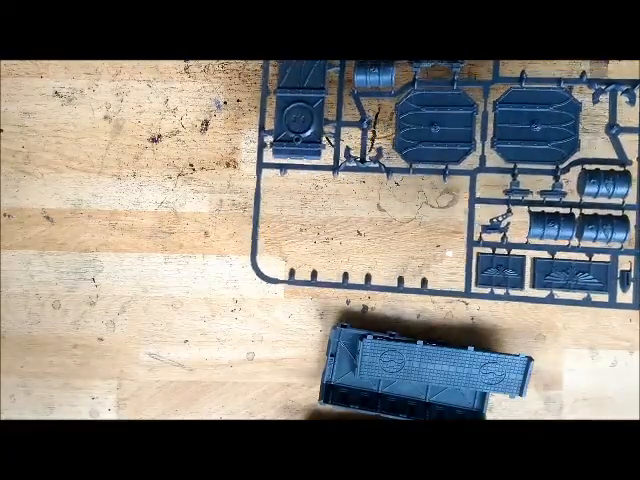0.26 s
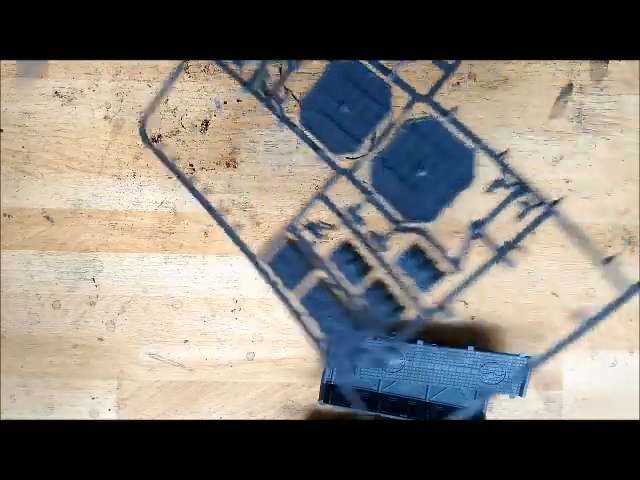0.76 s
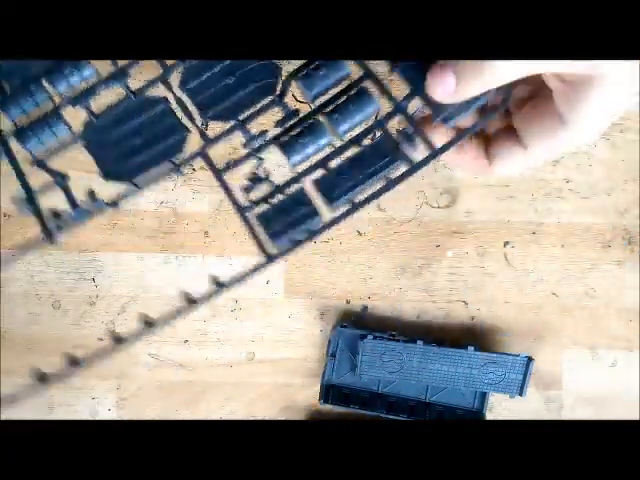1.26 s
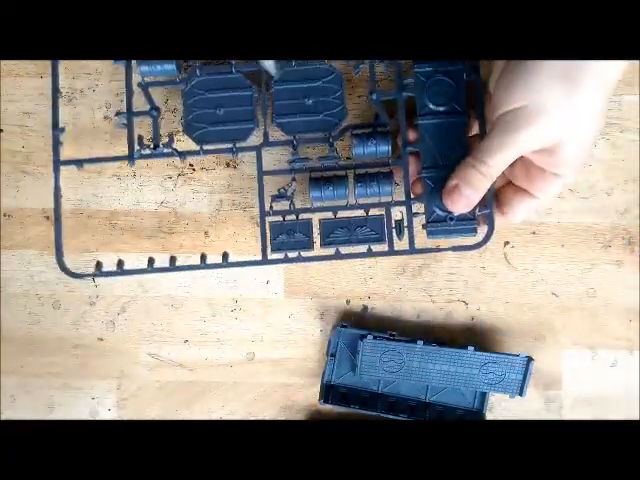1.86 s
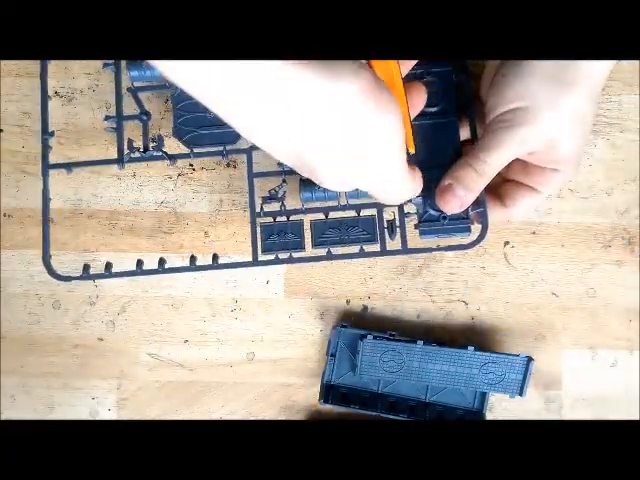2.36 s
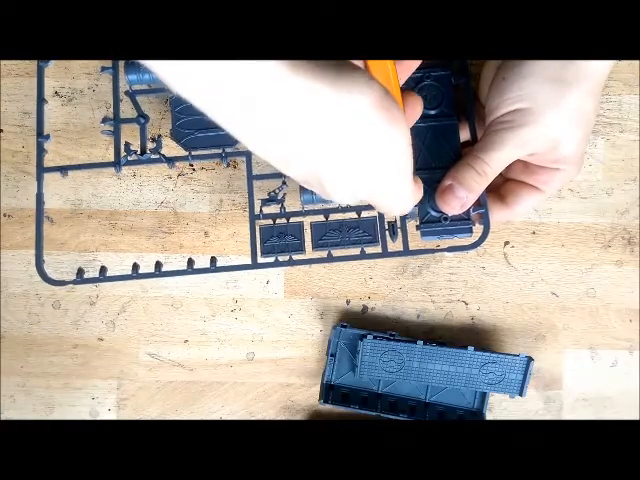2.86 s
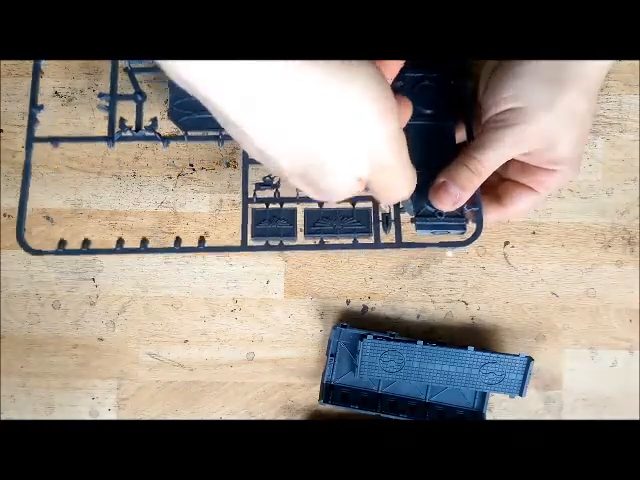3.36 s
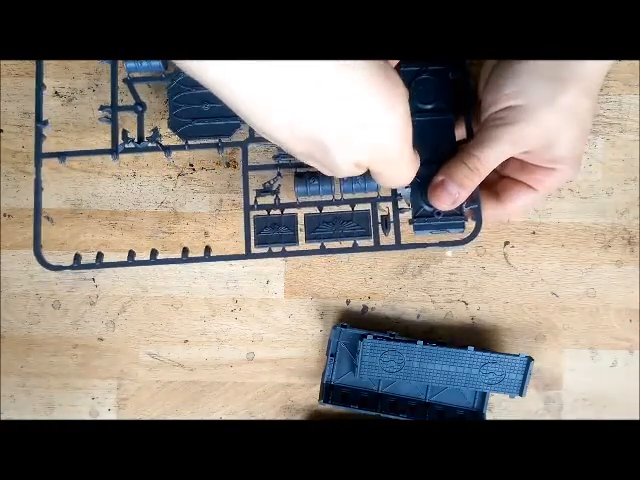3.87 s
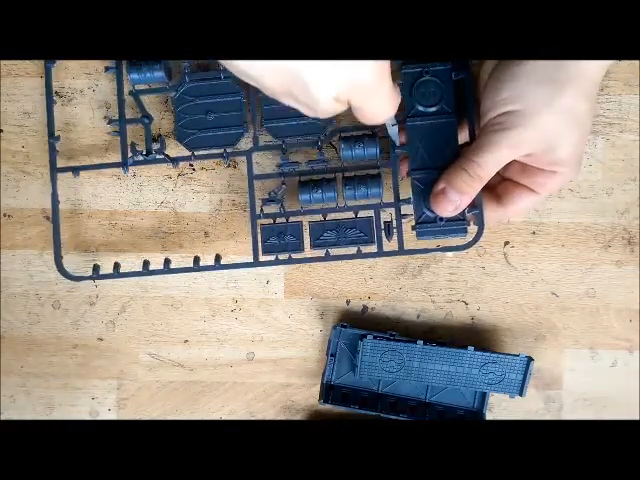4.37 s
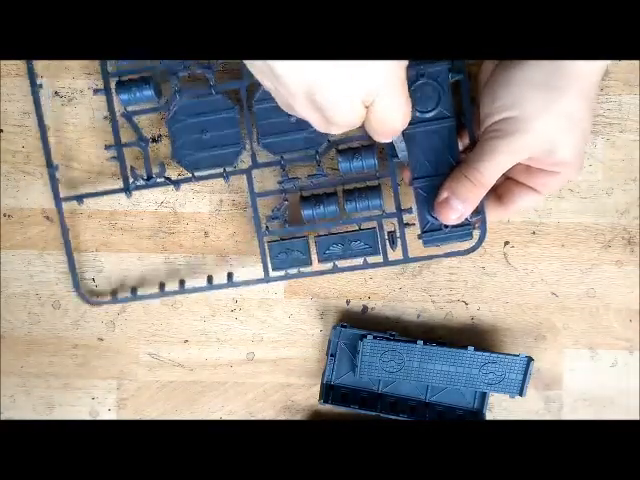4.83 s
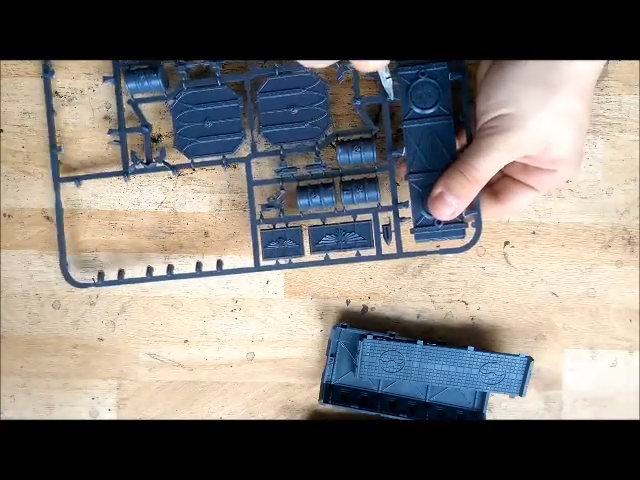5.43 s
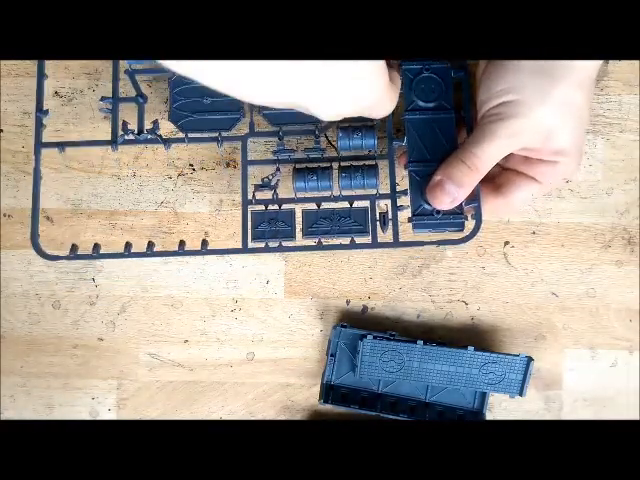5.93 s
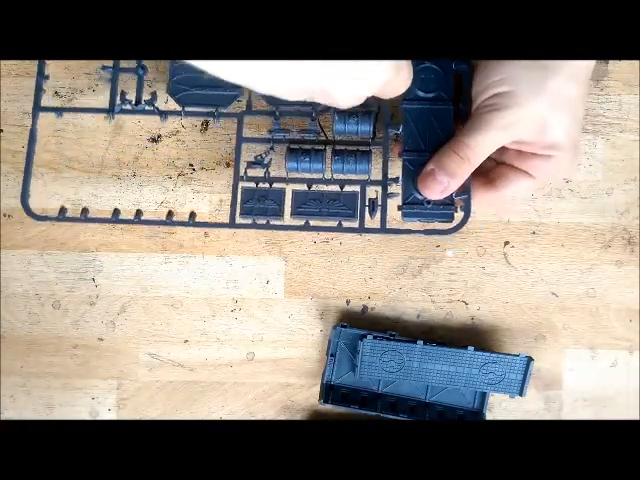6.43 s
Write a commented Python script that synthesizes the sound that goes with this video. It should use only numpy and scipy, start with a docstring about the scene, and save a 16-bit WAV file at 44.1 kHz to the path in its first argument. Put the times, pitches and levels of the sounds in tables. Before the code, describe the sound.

Close, in a small quiet room, a thin plastic kit frame is turned over with a clear click and a faint sliding whisper. It settles on a wooden table with light taps and sparse clicks. Around four seconds clippers snap through plastic and the frame rattles; a louder snip follows just before five seconds with a bright clatter. Small clicks and rubbing finish.

```python
"""Over a quiet room hush a plastic kit frame is turned over, rubbing and sliding faintly as filtered noise.
Tool and fingers click on the parts and the frame taps a wooden table: pushes and micro-slips excite resonances.
Random pulses give short noisy rings and creaks, and hands lean on the table, whose low modes boom under noise.
Then hobby clippers snip two gates, each a bite, a break and a weaker second crack, and the frame chatters.
Early bounces and a diffuse tail place these contacts in a small room."""
import sys
import numpy as np
from scipy import signal
from scipy.io import wavfile

SR = 44100
rng = np.random.default_rng(int(sys.argv[2]) if len(sys.argv) > 2 else 0)


def pcm_store(signal):
    """Save signal as 16-bit PCM."""
    levels = np.round(np.clip(np.atleast_2d(signal), -1, 1) * 32767)
    wavfile.write(sys.argv[1], SR, levels.astype(np.int16).T)


N = 295444

# tool and parts knocking together: (time [s], strength [dB], hardness [dB], ring pitch [Hz])
CLICK_EVENTS = [(.411, -32.5, 10, 2220), (0.5446, -64, 24.5, 2460), (0.5665, -62, 11, 1680),
                (.5972, -55, -15, 1000), (1.3416, -48, 14.5, 990), (1.447, -63.5, 3, 2520),
                (1.6158, -60, 2, 2800), (1.6316, -45.5, 13, 2940), (1.673, -52, -19, 2300),
                (1.6976, -52.5, 8, 2800), (1.711, -44.5, 15.5, 2830), (1.995, -60, -2, 3640),
                (2.0084, -42, 8.5, 2390), (2.2925, -53, -1.5, 2020), (2.811, -56.5, -6, 2060),
                (2.9636, -59.5, -17, 1250), (3.1448, -47.5, -17.5, 2360), (3.4615, -55.5, -18, 2370),
                (3.4862, -52.5, 2, 1160), (3.507, -50, -3, 1700), (4.5288, -54.5, -14.5, 1980),
                (4.7823, -42.5, -16.5, 1340), (5.3064, -46, 0.5, 1970), (5.4837, -53, -16.5, 1930),
                (5.9305, -45, -7, 2050), (6.0518, -52.5, -11, 1640), (6.475, -52, -6, 2950),
                (6.4874, -38.5, -13.5, 2060), (6.607, -49.5, -19, 2550), (6.6728, -56, 5.5, 5560)]
# the frame tapping the table: (time [s], strength [dB], hardness [dB])
TAP_EVENTS = [(1.7356, -37, -3), (1.7896, -48, -10), (1.846, -45, -5), (1.9121, -49, -5), (2.1731, -33, 6),
              (2.4766, -48.5, -1), (2.6978, -55, -2), (3.519, -36, 4), (3.5358, -29.5, -4.5),
              (3.641, -39, -12), (3.6852, -50.5, -4), (3.8014, -52.5, 4), (4.096, -30, 14.5),
              (4.1125, -23.5, 5), (4.126, -37.5, 15), (4.1627, -32.5, -6), (4.1889, -41, 6),
              (4.201, -45, 7), (4.215, -40.5, 9.5), (4.3216, -55, 4), (4.8004, -52, 5), (4.9469, -33, 20),
              (4.9502, -15.5, 0), (4.973, -36, 3), (5.0047, -23.5, 6), (5.0542, -38, -17),
              (5.1116, -27, 0.5), (5.1756, -49, 2), (5.322, -41, -4), (5.5138, -45.5, 2)]
MEDIUM_DB = -40  # strength of a medium contact


def from_db(db):
    """Amplitude ratio: 20 dB is a factor of ten."""
    return 10 ** (np.asarray(db) / 20)


def rms_one(x):
    """Normalisation to unit root-mean-square amplitude."""
    return x / np.sqrt(np.mean(x ** 2) + 1e-20)


def at_hz(points, hz):
    """Linear interpolation on a logarithmic frequency axis."""
    points_hz, values = np.array(points)[:, 0], np.array(points)[:, 1]
    return np.interp(np.log(hz), np.log(points_hz), values)


def in_time(curve):
    """Linear interpolation of a time curve at every sample."""
    return np.interp(np.arange(N) / SR, *np.transpose(curve))


def band(x, low, high, order=2):
    """Causal Butterworth band-pass filtering."""
    return signal.sosfilt(signal.butter(order, [low, high], "band", fs=SR, output="sos"), x)


def fade(t, t60):
    """Exponential decay of amplitude by 60 dB in t60."""
    return np.exp(-np.log(1000) * t / t60)


def resonate(x, hz, width):
    """Damped resonance: a two-pole filter with gain near 1 at its peak."""
    radius = np.exp(-np.pi * width / SR)
    zeros = np.array([1, 0, -1]) * (1 - radius * radius) / 2
    poles = [1, -2 * radius * np.cos(2 * np.pi * hz / SR), radius * radius]
    return signal.lfilter(zeros, poles, x)


def drift(rate):
    """Random modulation: Gaussian knots at rate per second, the last one held when they run out."""
    knots = rng.standard_normal(2000)
    return np.interp(np.arange(N) / SR * rate, np.arange(len(knots)), knots)


def noise_bands(size):
    """Interaural coherence: half-octave noise whose left-right correlation depends on frequency."""
    # (frequency [Hz], left-right correlation [-1 to 1])
    likeness = [(30, 0.35), (90, 0.78), (300, 0.646), (700, 0.43), (1500, 0.047), (12000, .05)]
    edges = 19 * 2 ** np.arange(0, 10.1, .5)
    # neighbouring bands take independent noise; the extra quarter second lets the filters settle
    white = rng.standard_normal((2, 2, size + SR // 4))
    for k, (low, high) in enumerate(zip(edges, edges[1:])):
        mid, side = band(white[k % 2], low, high)[:, -size:]
        hz = np.sqrt(low * high)
        alike = np.clip(at_hz(likeness, hz), -1, 1)
        yield hz, np.sqrt(1 + alike) * mid + np.sqrt(1 - alike) * side * [[1], [-1]]


def coloured(spectrum):
    """Spectral shaping: weighted stereo noise bands, normalised to rms 1."""
    return rms_one(sum(from_db(at_hz(spectrum, hz)) * x for hz, x in noise_bands(N)))


def hush():
    """Stationary background noise: a fixed spectrum at a steady level."""
    # (frequency [Hz], relative density [dB per Hz])
    density = [(20, -36), (50, -10), (88, 1), (140, -11.5), (300, -16.5), (700, -17), (1500, -35),
               (4000, -28), (7000, -29.5), (15000, -28.5)]
    return from_db(-67.5) * coloured(density) * from_db([[-.7], [.7]])


def low_rush():
    """Resonant filtering: noise in a few low modes sounds hollow and swells and sinks."""
    # (frequency [Hz], width of each of two passes [Hz], relative level [dB])
    modes = [(314.8, 22.6, -6.5), (402, 75, -2.5), (484.5, 44, -9.5)]
    # (time [s], level before 1 dB of gain [dB])
    swell = [(0.0, -103), (0.97, -83.5), (2.31, -62), (3.23, -78), (4.53, -75), (4.89, -73), (5.76, -79.5),
             (6.7, -67.5)]
    # one noise common to both sides, and a weaker one for each
    noise = rng.standard_normal(N) + 0.49 * rng.standard_normal((2, N))
    hollow = sum(from_db(db) * resonate(resonate(noise, hz, width), hz, width) for hz, width, db in modes)
    return from_db(in_time(swell) + 1) * rms_one(hollow)


def answer_db(rule, strength_db, hardness_db):
    """Power-law response: a level linear in the decibels of strength and hardness."""
    db, by_strength, by_hardness = rule
    return db + by_strength * (strength_db - MEDIUM_DB) + by_hardness * hardness_db


def shuffling():
    """Superposition of powers: every tap and click adds a quick rise before it and a slower fall after."""
    # (level at medium strength [dB], slope with strength [dB per dB], slope with hardness [dB per dB])
    shuffle_law = (-60.5, .4, -0.23)
    rise_t60, fall_t60 = 0.06, .5  # s
    kicks = np.zeros(N)
    for s, strength_db, hardness_db, *_ in list(TAP_EVENTS) + list(CLICK_EVENTS):
        kicks[int(s * SR)] += from_db(answer_db(shuffle_law, strength_db, hardness_db)) ** 2
    # power decays as amplitude squared
    rise, fall = fade(1 / SR, rise_t60) ** 2, fade(1 / SR, fall_t60) ** 2
    after = signal.lfilter([1], [1, -fall], kicks + 1e-18)
    before = signal.lfilter([0, 1], [1, -rise], kicks[::-1] + 1e-18)[::-1]
    return before + after


def frame(drive, frame_db):
    """Modal excitation: where the frame is touched sets each mode's strength, here drawn at random."""
    # frame lying on the table: (frequency [Hz], width [Hz], relative level [dB])
    modes = [(153, 3.1, 15), (294, 8.47, 13.5), (375, 81, 5.5), (480, 30, -8), (990, 36, 4),
             (1250, 36, -12), (1590, 63, 3.5), (2027, 38, 19.5), (2243, 210, 7), (2950, 57.7, 11.5),
             (3003, 170, 20.5), (3350, 145, 15), (3667, 57, 31), (3706, 120, 9), (5590, 930, 14),
             (8980, 5800, 14)]
    strengths = from_db(frame_db + 0.5 * rng.standard_normal(len(modes)))
    ringing = sum(g * from_db(db) * resonate(drive, hz, width) for g, (hz, width, db) in zip(strengths, modes))
    return drive + ringing


def room(x):
    """Room impulse response: early reflections and a diffuse tail that lasts longest in the bass."""
    # (frequency [Hz], level before a 6 dB cut [dB])
    tail_level = [(100, 7.5), (250, 3), (500, -10.5), (750, 10.5), (1200, -3), (2500, -5.5), (4000, -9),
                  (8000, -6), (15000, -4)]
    # (frequency [Hz], 60 dB decay time [s])
    tail_t60 = [(100, 0.55), (300, 0.2), (1000, 0.16), (2000, 0.19), (3500, 0.26), (8000, 0.24),
                (15000, 0.11)]
    # nearby surfaces: (left delay [s], right delay [s], level [dB])
    echoes = [(.0034, .004, -9.5), (0.0161, 0.012, -19)]
    t = np.arange(SR * 2 // 3) / SR
    onset = np.clip((t - .004) / 0.0013, 0, 1)
    response = 0
    for hz, noise in noise_bands(len(t)):
        shape = onset * fade(t, at_hz(tail_t60, hz))
        gain = from_db(at_hz(tail_level, hz) - 6.0)
        response = response + gain * noise * shape / np.linalg.norm(shape)
    bounces = np.zeros_like(response)
    for *delays_s, db in echoes:
        bounces[[0, 1], (np.array(delays_s) * SR).astype(int)] += from_db(db)
    # the diffuse sound has lost most of its direction
    mono = (x[1] * 0.88 + x[0] * 0.27)[None]
    diffuse = signal.fftconvolve(mono, response, axes=1) * from_db([[-1], [1]])
    return (diffuse + signal.fftconvolve(x, bounces, axes=1))[:, :N]


def handling():
    """Stick-slip friction: plastic rubs as a fine hiss, and catches in tiny slips that shake the frame."""
    # (frequency [Hz], relative density [dB per Hz])
    rub_colour = [(40, 1.5), (110, 5.5), (280, -0.5), (700, -2.5), (1100, 1), (2200, -3.5), (3700, -11.5),
                  (5000, -13.5), (10000, -14), (16000, -23)]
    # rubbing under the hands: (time [s], level before 4 dB of gain and the mix of grains and hiss [dB])
    rubbing = [(0.0, -78.5), (1.14, -75), (1.68, -70.5), (1.81, -65), (2.46, -72.5), (3.51, -77.5),
               (3.64, -74.5), (4.01, -71), (4.2, -65), (4.35, -73), (4.78, -71.5), (5.0, -55),
               (5.26, -77.5), (5.6, -75), (6.44, -73.5), (6.7, -61.5)]
    sizes_db = 3.126 * np.minimum(rng.exponential(1, N), 3.5)
    sizes = from_db(sizes_db) * rng.choice([-1, 1], N)
    slips = sizes * (rng.random(N) < 130 / SR) + 1e-18  # about 130 slips per second
    grains = band(frame(slips, frame_db=-12.5), 690, 2900) * from_db([[-2.5], [2.5]])
    grains = rms_one(grains + room(grains))
    flicker = from_db(0.46 * drift(53) + 2.93 * drift(420))
    hiss = flicker * coloured(rub_colour) * from_db([[-1.2], [1.2]])
    # steady rubbing is mostly hiss, while shuffling parts are gritty
    steady, loose = from_db(in_time(rubbing) + 4), np.sqrt(shuffling())
    grain_level = np.hypot(from_db(-13.5) * steady, from_db(-3.5) * loose)
    hiss_level = np.hypot(from_db(-1.0) * steady, from_db(-2) * loose)
    return grain_level * grains + hiss_level * hiss


def register_levels(law, strength_db, hardness_db):
    """Contact nonlinearity: strength lifts the treble more than the bass, and hardness adds crack."""
    return np.array([answer_db(rule, strength_db, hardness_db) for rule in law])


def contact(levels_db, pan_db, part_modes, slip_db, slip_t60, frame_db, soft_hz):
    """Impact excitation: a sharp push and a dying spray of micro-slips shake the frame and touched part."""
    # thud, knock, ring and crack: (low edge [Hz], high edge [Hz])
    registers = [(70, 580), (900, 2500), (2500, 5000), (5000, 15000)]
    t = np.arange(SR // 6) / SR
    spray = rng.standard_normal((3, len(t))) * fade(t, slip_t60)
    spray /= np.linalg.norm(spray, axis=1, keepdims=True)
    # the push reaches both sides; its scatter off the table and hands differs for each
    push = (t == 0) + from_db(slip_db) * spray[2]
    drive = push + from_db(slip_db + 4.5) * spray[:2] * from_db([[4], [-4]])
    part_ring = sum(from_db(db) * resonate(drive, hz, width) for hz, width, db in part_modes)
    body = frame(drive, frame_db) + part_ring
    # a longer touch rounds off the top
    pole = np.exp(-2 * np.pi * soft_hz / SR)
    body = signal.lfilter([1 - pole], [1, -pole], body)
    out, attack = 0, round(.008 * SR)
    for k, ((low, high), db) in enumerate(zip(registers, levels_db)):
        # the long waves of the thud reach both sides alike, but for a small level difference
        source, lean_db = (body[[1, 1]], -2.5) if k == 0 else (body, pan_db)
        part = band(source, low, high, order=4)
        part = part / np.linalg.norm(part, axis=1, keepdims=True)
        part = part * from_db([[lean_db / 2], [-lean_db / 2]])
        # each register's level is its rms over the attack
        out = out + from_db(db) * part / np.sqrt(np.mean(part[:, :attack] ** 2))
    return out


def add(track, s, sound):
    """Interaural time difference: a sound mixed in at time s reaches the left side a little later."""
    for channel, lag_s in enumerate((.00022, 0)):
        start = int((s + lag_s) * SR)
        span = track[channel, start:start + sound.shape[1]]
        span += sound[channel, :len(span)]


def clicks():
    """Boundary conditions: each hard knock has its part's pitch, and the lifted frame rings freely."""
    # thud, knock, ring, crack: (level at medium strength [dB], strength slope [dB/dB], hardness slope [dB/dB])
    click_law = [(-50.5, 0.81, 0.33), (-41.5, 1, 0), (-46, 0.98, 0.21), (-49.5, 1, 1)]
    # when the frame is off the table: (start [s], end [s])
    lifted = (.5, 2.1)
    # level change off the table, with less thud passed to the wood: (thud, knock, ring, crack [dB])
    lifted_db = (-8, 0.5, 3.5, -0.5)
    # what answers a knock in the air: (frequency [Hz], width [Hz], relative level [dB])
    free_modes = [(495, 10, 18.5), (981, 18, 12)]
    # what answers a knock on the table: (frequency [Hz], width [Hz], relative level [dB])
    table_modes = [(140.5, 19, 15.8), (343, 138, 16.5), (2270, 370, 3.5)]
    out = np.zeros((2, N))
    for s, strength_db, hardness_db, hz in CLICK_EVENTS:
        levels_db = register_levels(click_law, strength_db, hardness_db)
        support = table_modes
        if lifted[0] < s < lifted[1]:
            support, levels_db = free_modes, levels_db + lifted_db
        modes = [(hz, 130, 10), (1.4 * hz, 220, 6)] + list(support)
        knock = contact(levels_db, -6, modes, slip_db=-1, slip_t60=0.029, frame_db=-17.5, soft_hz=5990)
        add(out, s, knock)
    return out


def slide():
    """Sliding friction: skin on plastic, as the frame is turned, gives a thin whisper of resonant noise."""
    # (time [s], level [dB])
    level = [(.78, -88), (.93, -71.5), (1.1, -87), (1.18, -64.5), (1.3, -84)]
    # (frequency [Hz], width [Hz], relative level [dB])
    modes = [(3750, 260, -5), (10530, 3200, -17)]
    noise = rng.standard_normal((2, N))
    whisper = sum(from_db(db) * resonate(noise, hz, width) for hz, width, db in modes)
    return from_db(in_time(level)) * rms_one(whisper)


def squeaks_and_rings():
    """Resonance under random pulses: short noisy rings and creaks, each in one narrow band."""
    # (time [s], length [s], pitch [Hz], level at the envelope's peak before panning [dB])
    events = [(1.639, 0.033, 2820, -53), (3.157, 0.066, 2360, -60.5), (3.461, 0.048, 2320, -68),
              (4.648, 0.049, 2500, -64), (5.065, 0.057, 2530, -46), (5.808, 0.041, 2863, -68),
              (6.484, 0.048, 2960, -58), (6.486, 0.018, 1980, -43.5), (6.592, 0.061, 2520, -59),
              (6.593, 0.038, 6400, -73)]
    out = np.zeros((2, N))
    t = np.arange(SR // 6) / SR
    for s, length, hz, db in events:
        pulses = rng.standard_normal((2, len(t))) * (rng.random(len(t)) < 900 / SR)  # about 900 per second
        envelope = np.sin(np.pi * np.minimum(t / length, 1))
        ringing = rms_one(resonate(pulses, hz, 170) + from_db(-23.5) * band(pulses, 780, 5000))
        add(out, s, from_db(db) * envelope * ringing * from_db([[-3], [2]]))
    return out


def taps():
    """Impact on a support: the frame falls back on the wood and rings with its own modes."""
    # thud, knock, ring, crack, before a 3 dB cut:
    # (level at medium strength [dB], strength slope [dB/dB], hardness slope [dB/dB])
    tap_law = [(-55, 0.61, 0.054), (-44, 0.66, 0), (-40, 1, 0), (-57.5, 1, 1)]
    # thin runners that ring along with every tap: (frequency [Hz], width [Hz], relative level [dB])
    runner_modes = [(3660, 200, 20.5), (3890, 72, 26), (4240, 72, 17)]
    out = np.zeros((2, N))
    modes = [(3570, 51, 19.5), (3040, 360, 5.4)] + list(runner_modes)
    for s, strength_db, hardness_db in TAP_EVENTS:
        levels_db = register_levels(tap_law, strength_db, hardness_db)
        # a strong tap lands more cleanly, a weak one scrapes
        scrape_db = 2.5 - 0.24 * (strength_db - MEDIUM_DB)
        tap = contact(levels_db, -7, modes, slip_db=scrape_db, slip_t60=0.03, frame_db=-3.0, soft_hz=2477)
        add(out, s, tap)
    return from_db(-3) * out


def leans():
    """Forced plate vibration: a hand presses and rolls on the table top, which booms softly."""
    # (time [s], length [s], peak level [dB])
    presses = [(3.118, 0.13, -62.5), (3.427, 0.2, -58), (6.468, 0.28, -57.5)]
    # table top: (frequency [Hz], width of each of two passes [Hz], relative level [dB])
    board_modes = [(68, 29, -5.5), (103, 18, 0.5), (138, 33, 3), (284, 19, 0)]
    noise = rng.standard_normal(N) + 0.36 * rng.standard_normal((2, N))
    boom = sum(from_db(db) * resonate(resonate(noise, hz, width), hz, width) for hz, width, db in board_modes)
    t = np.arange(N) / SR
    pressure = sum(from_db(db) * np.sin(np.pi * np.clip((t - s) / length, 0, 1)) for s, length, db in presses)
    return pressure * rms_one(boom)


def snips():
    """Fracture: the jaws bite, the gate breaks with a hollow knock, and a weaker second crack follows."""
    # levels before a 2 dB cut:
    # (bite time [s], bite level [dB], break time [s], break level [dB], left over right [dB], ring pitch [Hz])
    cuts = [(4.0174, -37.5, 4.0513, -27.5, -4.5, 3220), (4.871, -31.5, 4.8841, -19.5, -10.5, 2174)]
    # biting into plastic, against the bite level: (thud, knock, ring, crack [dB])
    bite_offsets = (-17.5, -12.5, -0.5, -3)
    # breaking plastic, against the break level: (thud, knock, ring, crack [dB])
    break_offsets = (-20, -1, -7, -3.5)
    # a weaker second crack 17 ms after the break, its level against the bite
    after_delay_s, after_db, after_pan_db = .017, -2.5, 7.5
    out = np.zeros((2, N))
    for bite_s, bite_db, break_s, snap_db, pan_db, hz in cuts:
        modes = [(hz, 600, 9), (1250, 250, 2), (520, 80, 12)]
        bite_levels, break_levels = bite_db + np.array(bite_offsets), snap_db + np.array(break_offsets)
        stages = [
            (bite_s, bite_levels, pan_db),
            (break_s, break_levels, pan_db),
            (break_s + after_delay_s, bite_levels + after_db, after_pan_db),
        ]
        for s, levels_db, lean_db in stages:
            crack = contact(levels_db, lean_db, modes, slip_db=0, slip_t60=0.031, frame_db=-14.5, soft_hz=7000)
            add(out, s, crack)
    return from_db(-2.0) * out


def scene():
    """Superposition: contacts close by, their room sound, handling and hush."""
    contacts = snips() + clicks() + taps() + squeaks_and_rings()
    return contacts + room(contacts) + handling() + leans() + slide() + low_rush() + hush()


def record(dry):
    """Tone filtering: a dip near 877 Hz, a duller right side and a steep cut of the top."""
    left, right = dry - 0.49 * resonate(dry, 877, 100)
    right = signal.sosfilt(signal.butter(1, 11500, fs=SR, output="sos"), right)
    steep_cut = signal.ellip(10, .2, 80, 16000, fs=SR, output="sos")
    return signal.sosfilt(steep_cut, [left, right])


dry = scene()
out = record(dry)
pcm_store(out)
```